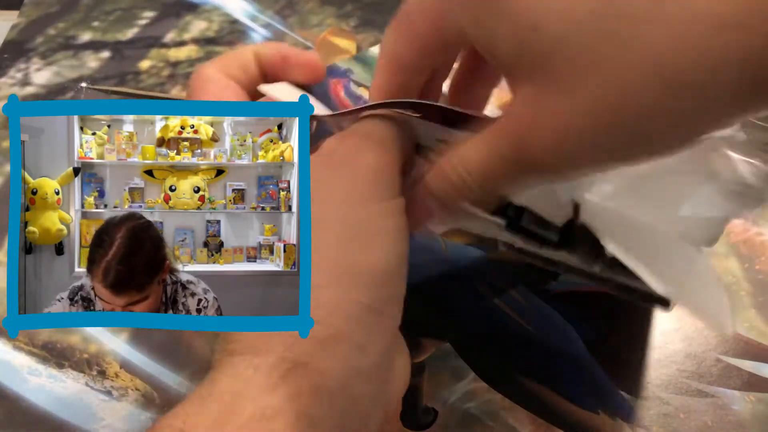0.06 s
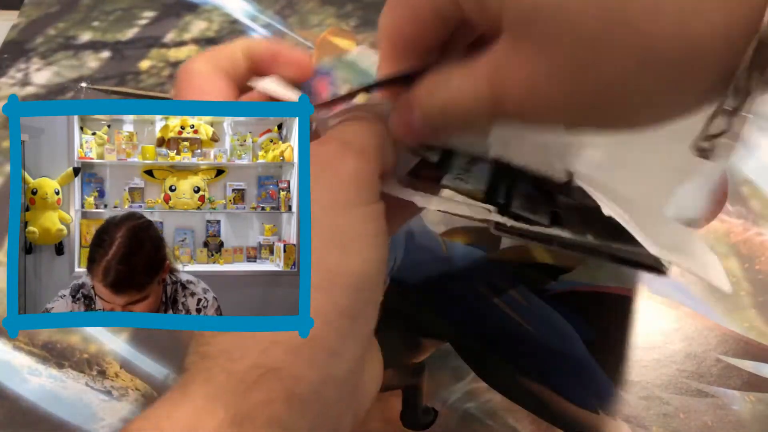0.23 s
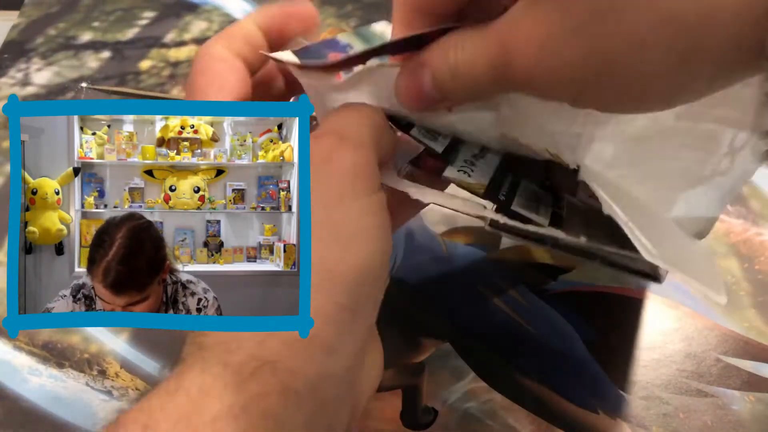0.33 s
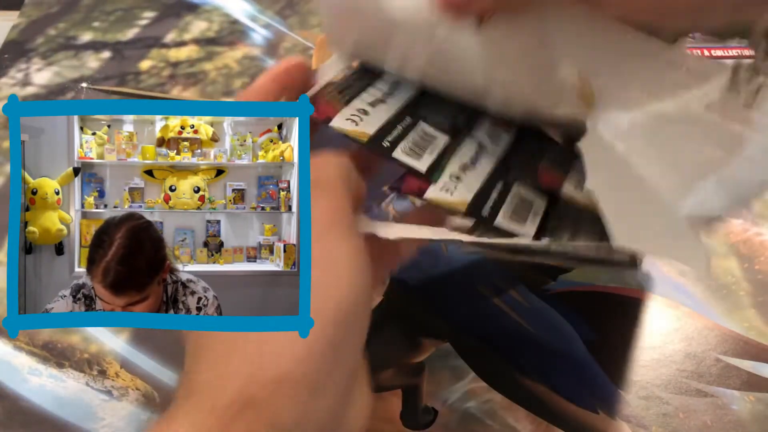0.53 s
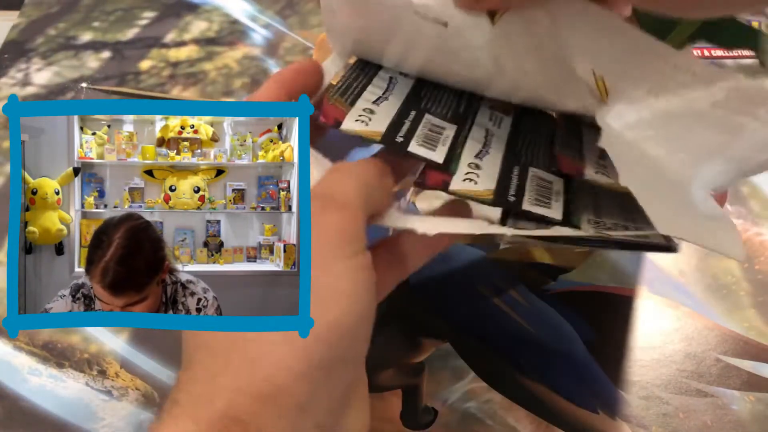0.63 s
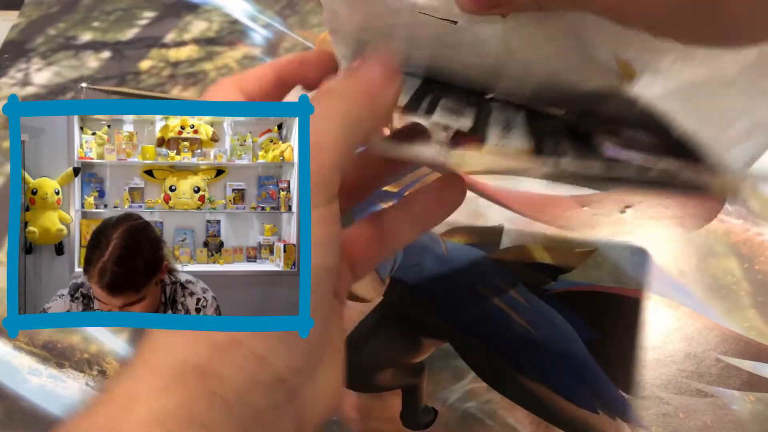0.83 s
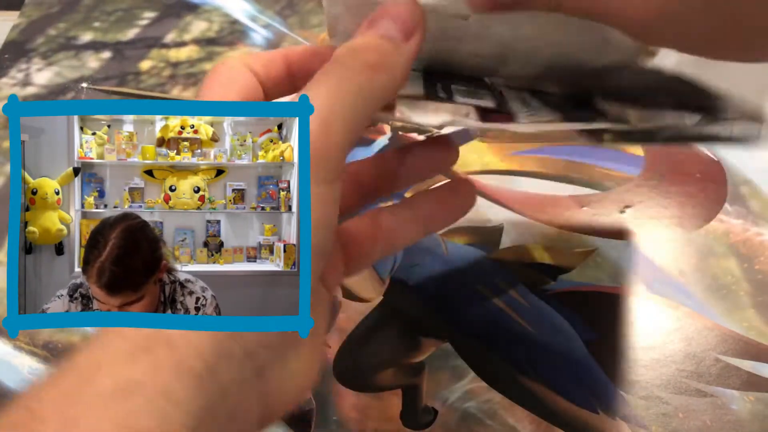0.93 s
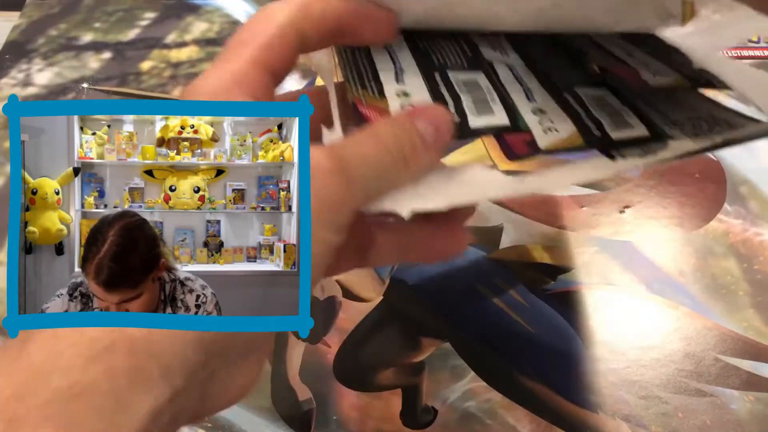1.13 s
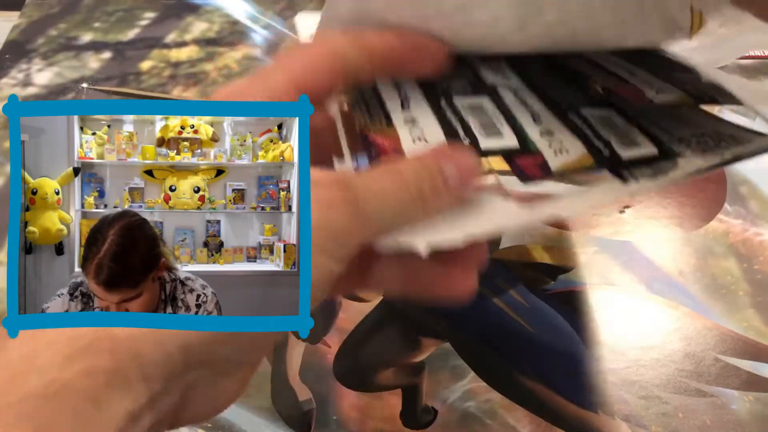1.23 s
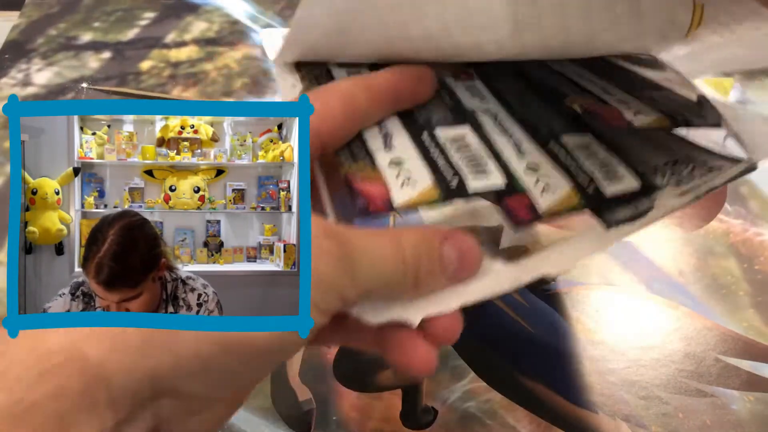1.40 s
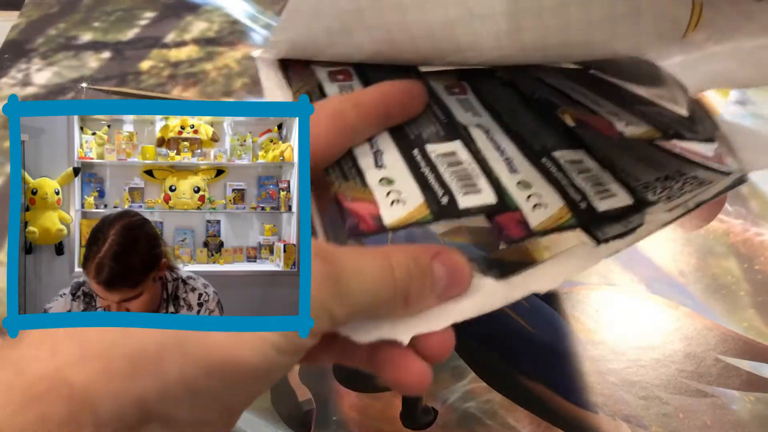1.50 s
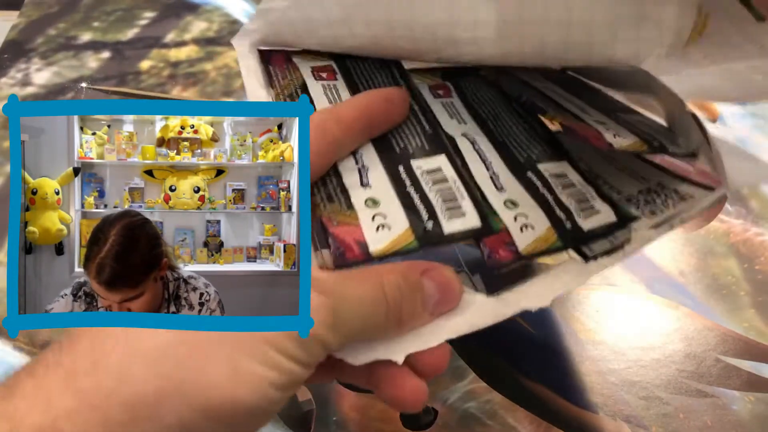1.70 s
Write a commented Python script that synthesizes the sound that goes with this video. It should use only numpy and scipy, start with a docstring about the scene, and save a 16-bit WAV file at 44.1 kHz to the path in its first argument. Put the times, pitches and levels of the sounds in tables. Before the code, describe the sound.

Plastic packaging is torn open by hand, very close, in a small quiet room. Faint rustles and dull creases lead to a loud, sharp snap at 0.23 s with a short roomy tail. A crackling rip swells from 0.35, peaks near 0.54 with a low thump, and ends by 0.7. Quiet small ticks follow; from 1.05 foil packets rasp, slide and crinkle in bursts with soft card knocks until the end.

```python
"""A plastic and cardboard pack is opened by hand, close by in a small room. After a faint rustle
a seal snaps: a brief crack, a bending wave falling in pitch and ringing modes of the pack.
The sheet rips away in a swelling crackle of tiny fractures and flaps with low falling thumps.
Then the foil packets inside slide over the card: filtered crackle follows their levels, crinkling
in short bursts under the fingers, with creases popping, resonant rasps and soft knocks on the card."""
import sys
import numpy as np
from scipy import signal
from scipy.fft import rfft, irfft
from scipy.io import wavfile

SR = 44100
rng = np.random.default_rng(int(sys.argv[2]) if len(sys.argv) > 2 else 0)


def pcm_store(signal):
    """Save signal as 16-bit PCM."""
    levels = np.round(np.clip(np.atleast_2d(signal), -1, 1) * 32767)
    wavfile.write(sys.argv[1], SR, levels.astype(np.int16).T)


N = 77175  # samples, 1.75 s
TOP_HZ = 16300  # upper limit of the sound


def undb(db):
    """Logarithmic level: decibels to amplitude gain."""
    return 10 ** (np.asarray(db) / 20)


def unit(x):
    """Normalisation of power: scale to rms 1."""
    return x / np.sqrt(np.mean(x ** 2) + 1e-18)


def since(start):
    """Elapsed time: seconds since a moment, zero before it."""
    return np.maximum(np.arange(N) / SR - start, 0)


def ring(start, t60):
    """Exponential decay: starts at once and falls by 60 dB in t60 seconds."""
    age = since(start)
    return (age > 0) * np.exp(-np.log(1000) * age / t60)


def bell(centre, width):
    """Gaussian envelope: swells and fades about a moment, width being its standard deviation."""
    t = np.arange(N) / SR
    return np.exp(-.5 * ((t - centre) / width) ** 2)


def resonate(x, hz, width_hz):
    """Resonance by heterodyning: shift the moving centre to zero, low-pass twice, shift back; rms 1."""
    turn = np.exp(2j * np.pi * np.cumsum(hz) / SR)
    pole = np.exp(-np.pi * width_hz / SR)
    smoothed = signal.lfilter([1], np.poly([pole, pole]), x / turn)
    return unit((smoothed * turn).real)


def curve(rows, axis=1):
    """Level contour: gain along one dB column of a table, silent before its first row."""
    rows, t = np.array(rows), np.arange(N) / SR
    return undb(np.interp(t, rows[:, 0], rows[:, axis])) * (t >= rows[0, 0])


def colour(x, points):
    """Minimum-phase filtering: a causal response through (Hz, dB) points, with unit power gain."""
    size = 8192
    hz, db = np.array(points).T
    bins_hz = np.arange(size // 2 + 1) * SR / size
    log_gain = np.log(undb(np.interp(np.log(bins_hz + 1), np.log(hz), db)))
    # folding the cepstrum forward in time makes the response causal
    cepstrum = irfft(log_gain)
    cepstrum[1:size // 2] *= 2
    cepstrum[size // 2 + 1:] = 0
    response = irfft(np.exp(rfft(cepstrum)))
    return signal.fftconvolve(x, response / np.linalg.norm(response))[:N]


def noise(points):
    """Spectral shaping: white noise filtered to a colour, about rms 1."""
    return colour(rng.standard_normal(N), points)


def crackle(per_s, spread_db, hiss):
    """Shot noise: tiny fractures of uneven size at random moments, with a share of smooth friction."""
    size = undb(spread_db * np.minimum(rng.exponential(size=N), 4))
    happens = rng.random(N) < per_s / SR
    clicks = unit(happens * size * rng.choice([-1, 1], N))
    return unit(clicks + hiss * rng.standard_normal(N))


FACET_LOW_HZ, FACET_CYCLES = 567, 2.6  # lowest pitch; cycles in which a ring falls to 1/e
FACETS_PER_S, FACET_SHARE = 7000, 0.79  # share is an amplitude, against 0.5 of plain crackle


def facets(per_s, spread_db, hiss):
    """Superposed damped rings: fractures ring at their own pitches, flat in spectrum on average."""
    out, age = np.zeros(2 * N), np.arange(SR // 100) / SR
    for when, pitch, size, turn in rng.random((int(FACETS_PER_S * N / SR), 4)):
        hz = FACET_LOW_HZ + (TOP_HZ - FACET_LOW_HZ) * pitch
        # the root of the pitch makes up for the shorter ring of a high facet
        gain = np.sqrt(hz) * undb(-spread_db * np.log(max(size, np.exp(-2))))
        decay = np.exp(-age * hz / FACET_CYCLES)
        start = int(when * N)
        out[start:start + len(age)] += gain * decay * np.sin(2 * np.pi * (hz * age + turn))
    return unit(FACET_SHARE * unit(out[:N]) + crackle(per_s, spread_db, hiss) / 2)


def struck(start, modes):
    """Modal superposition: damped modes start together, with alternating polarity."""
    out = np.zeros(N)
    for k, (hz, db, t60) in enumerate(modes):
        out += undb(db) * ring(start, t60) * np.sin(2 * np.pi * hz * since(start)) * (-1) ** k
    return out


# spectrum of the quiet room: (frequency [Hz], relative level [dB])
FLOOR_COLOUR = [(20, -14), (50, 4.5), (300, -13), (550, -23), (2600, -11.5), (16000, -52)]
FLOOR_DB = -63.5


def room_floor():
    """Stationary background noise: a steady, coloured random pressure."""
    return undb(FLOOR_DB) * noise(FLOOR_COLOUR)


# spectrum of the reverberation: (frequency [Hz], relative level [dB])
ROOM_COLOUR = [(90, -6.5), (270, -2.5), (1300, 2.5), (2400, -2), (16000, -14.5)]
ROOM_T60_S, ROOM_DELAY_S = 0.43, 0.0027


def room(x):
    """Reverberation as convolution: a short, dull decaying-noise tail from table and walls."""
    tail = noise(ROOM_COLOUR) * ring(ROOM_DELAY_S, ROOM_T60_S)
    return signal.fftconvolve(x, tail / np.linalg.norm(tail))[:N] / 2


# low spectrum of the moving sheet and pack: (frequency [Hz], relative level [dB])
RIP_BASS = [(25, -15), (150, -7.5), (215, -2.5), (290, 0.5), (450, -7), (2000, -36.5)]
GRIP_S, GRIP_WIDTH_S, GRIP_DB = 1.14, 0.17, -60


def grip():
    """Low-frequency random excitation: the pack rumbles while the hands take a new grip."""
    return undb(GRIP_DB) * bell(GRIP_S, GRIP_WIDTH_S) * noise(RIP_BASS)


# packets dragging on the card: (time [s], level [dB], resonance [Hz])
DRAG = [(1.083, -45, 576), (1.135, -49.5, 640), (1.205, -46, 855), (1.29, -52, 770), (1.48, -49, 860),
        (1.75, -84, 850)]
# the larger slips: (time [s], drive level [dB])
SLIPS = [(1.0848, -35.5), (1.1196, -35.5)]
DRAG_PER_S, DRAG_SPREAD_DB, DRAG_WIDTH_HZ = 420, 1.5, 470
SLIP_T60_S = 0.026


def drag():
    """Stick-slip friction: packets rasp through a hollow whose resonance moves as they drag."""
    rows = np.array(DRAG)
    hz = np.interp(np.arange(N) / SR, rows[:, 0], rows[:, 2])
    friction = crackle(DRAG_PER_S, DRAG_SPREAD_DB, hiss=0.33)
    rasp = curve(DRAG) * resonate(friction, hz, DRAG_WIDTH_HZ)
    # subtracting a faster decay rounds the onset of each slip
    slips = sum(undb(db) * (ring(s, SLIP_T60_S) - ring(s, SLIP_T60_S / 10)) for s, db in SLIPS)
    return rasp + slips * resonate(rng.standard_normal(N), hz, DRAG_WIDTH_HZ)


# the sheet flexing: (time [s], peak level [dB], start pitch [Hz], end pitch [Hz], fade [s])
FLEXES = [(0.099, -44, 137, 48.6, 0.0095), (.231, -47, 202, 44, 0.011), (0.534, -32.5, 356, 49.6, 0.0075),
          (0.609, -37, 184, 133, 0.0058), (1.231, -43.5, 312, 69, 0.0077)]


def flexes():
    """Bending of a flexible sheet: each thump swells, fades and falls in pitch."""
    out = np.zeros(N)
    for s, db, start_hz, end_hz, fade in FLEXES:
        age = since(s)
        hz = end_hz + (start_hz - end_hz) * np.exp(-age / fade)
        swell = age / fade * np.exp(1 - age / fade)
        out += undb(db) * swell * np.sin(2 * np.pi * np.cumsum(hz * (age > 0)) / SR)
    return out


# modes of the card: (frequency [Hz], relative level [dB], t60 [s])
CARD_MODES = [(214, 3.5, 0.017), (264.6, -1, 0.068), (334, -5, 0.063)]
# soft knocks on the card: (time [s], drive level [dB])
KNOCKS = [(0.857, -43), (1.153, -34), (1.362, -38), (1.427, -36), (1.504, -33), (1.71, -40.5)]


def knocks():
    """Impulsive excitation of modes: a soft contact rounds the onset of the card's ring."""
    return sum(undb(db) * (1 - np.exp(-since(s) / 0.001)) * struck(s, CARD_MODES) for s, db in KNOCKS)


CARD_RING_DB = -24.5


def on_card(x):
    """Sympathetic resonance: a sound together with the ring that it stirs in the card."""
    response = struck(0, CARD_MODES)
    stirred = signal.fftconvolve(x, response / np.linalg.norm(response))[:N]
    return x + undb(CARD_RING_DB) * stirred


# single creases popping: (time [s], level [dB], treble relative to it [dB])
CREASES = [(0.0581, -41.5, -19), (0.0923, -36, -27), (.336, -33.5, 7), (0.4115, -33.5, 4), (.4572, -39, 9),
           (0.494, -23, 1.5), (0.529, -21.5, 4.5), (0.535, -15.5, -12), (0.5438, -28, -8), (0.5604, -33, 8),
           (0.588, -36, -24), (0.6151, -30, -28), (0.659, -29.5, -30), (.852, -40.5, 5),
           (0.888, -38.5, -31), (1.064, -47.5, 8), (1.0712, -37, 9.5), (1.1412, -30, 1.5), (1.3283, -41, 7),
           (1.354, -36.5, 4), (1.4591, -36.5, -8), (1.5023, -32.5, 5.5), (1.7108, -36.5, -2.5)]
# body spectrum of a crease: (frequency [Hz], relative level [dB per Hz])
CREASE_BODY = [(150, -16), (550, -3.5), (1300, 5), (3400, -5), (16000, -61)]
# treble spectrum shared by creases, foil, rip and crack: (frequency [Hz], relative level [dB])
TREBLE = [(1500, -25.5), (3000, 4), (4200, 2), (7300, -4), (8700, 0.5), (11600, -1.5), (13500, -6),
          (16000, -20.5)]
CREASE_T60_S = 0.013


def creases():
    """Buckling instability: each crease gives way in a short burst, dull in card, bright in foil."""
    body_level, treble_level = np.zeros(N), np.zeros(N)
    for s, db, treble_db in CREASES:
        burst = undb(db) * ring(s, CREASE_T60_S)
        body_level += burst
        treble_level += burst * undb(treble_db)
    body = colour(body_level * rng.standard_normal(N), CREASE_BODY)
    treble = colour(treble_level * rng.standard_normal(N), TREBLE)
    return body + treble


# packets sliding: (time [s], treble level [dB], middle level [dB])
SLIDE = [(0, -68, -59.5), (.06, -75.5, -74.5), (.124, -57, -50), (.16, -72, -65), (.205, -58, -55),
         (.3, -75, -71), (.76, -76, -65), (.802, -56.5, -54), (.93, -70.5, -65), (1.04, -59, -51),
         (1.09, -49, -54.5), (1.17, -51, -48), (1.255, -58, -54.5), (1.385, -48.5, -49), (1.49, -45.5, -45),
         (1.55, -48.5, -49.5), (1.66, -51.5, -49), (1.75, -58, -57)]
# bursts of crinkling: (centre time [s], standard deviation [s], level [dB], relative treble [dB])
CRINKLES = [(1.134, 0.0045, -38.5, -4), (1.155, 0.0035, -40.5, -19), (1.2925, 0.0034, -40.5, -2.5),
            (1.3612, 0.0012, -42.5, -3), (1.423, 0.0085, -38.5, 1), (1.463, 0.0018, -32.5, 0.5),
            (1.475, 0.0074, -37.5, -5), (1.506, 0.003, -40.5, -2), (1.572, 0.0033, -40.5, -5),
            (1.5874, 0.0018, -36.5, -4), (1.623, 0.0035, -43, -6), (1.644, 0.0029, -39.5, -2.5)]
# middle spectrum of the foil: (frequency [Hz], relative level [dB])
FOIL_MIDDLE = [(100, -11.5), (270, 4), (400, 1), (560, -11), (860, -2), (1850, -4.5), (2400, -1),
               (3000, -2.5), (4000, -8), (12000, -69)]
FOIL_PER_S, FOIL_SPREAD_DB, FOIL_HISS = 900, 2, 0.62  # hiss is relative to the clicks
TAUT_S, TAUT_SPAN_S, TAUT_DB, TAUT_HZ, TAUT_WIDTH_HZ = 1.63, 0.028, -50.5, 2280, 960


def foil():
    """Friction and folding: sliding packets rustle, crinkle in bursts, and one held taut resonates."""
    treble, middle = curve(SLIDE, axis=1), curve(SLIDE, axis=2)
    for s, width, db, treble_db in CRINKLES:
        burst = undb(db) * bell(s, width)
        # powers add
        treble = np.hypot(treble, undb(treble_db) * burst)
        middle = np.hypot(middle, burst)
    folds = facets(FOIL_PER_S, FOIL_SPREAD_DB, FOIL_HISS)
    taut_ring = resonate(folds, np.full(N, TAUT_HZ), TAUT_WIDTH_HZ)
    taut = undb(TAUT_DB) * bell(TAUT_S, TAUT_SPAN_S) * taut_ring
    return colour(folds * treble, TREBLE) + colour(folds * middle, FOIL_MIDDLE) + taut


# the rip: (time [s], treble level [dB], middle level [dB], bass level [dB])
RIP = [(.28, -51.5, -72, -63), (.35, -47, -50, -65), (.369, -36.5, -42, -55.5), (.395, -45.5, -50, -72),
       (.452, -44.5, -50, -61.5), (.472, -36, -39.5, -52.5), (.517, -31, -31.5, -46.5),
       (.535, -26.5, -24, -28), (.572, -30, -35.5, -37), (.587, -27.5, -28, -41.5), (.605, -43.5, -44, -41),
       (.655, -56.5, -44.5, -44.5), (.715, -85, -90, -81)]
# middle spectrum of the rip: (frequency [Hz], relative level [dB])
RIP_MIDDLE = [(250, -33), (1060, 2), (1900, -0.5), (2750, 6), (3500, -3.5), (12000, -54.5)]
RIP_PER_S, RIP_SPREAD_DB, RIP_HISS = 1500, 3, 0.3  # hiss is relative to the clicks
CATCHES_PER_S, CATCH_DB = 260, 1.1  # the tear catches and runs on; rms change of level


def rip():
    """Intermittent fracture: fibres part in fits and starts while the freed sheet booms."""
    # a random level is held from one catch to the next
    catch_count = np.cumsum(rng.random(N) < CATCHES_PER_S / SR)
    catch = rng.uniform(-0.92, 1, N)[catch_count]
    fibres = unit(facets(RIP_PER_S, RIP_SPREAD_DB, RIP_HISS) * undb(CATCH_DB * unit(catch)))
    treble = curve(RIP, axis=1) * colour(fibres, TREBLE)
    middle = curve(RIP, axis=2) * colour(fibres, RIP_MIDDLE)
    boom = curve(RIP, axis=3) * noise(RIP_BASS)
    return treble + middle + boom


# modes of the pack: (frequency [Hz], relative level [dB], t60 [s])
PACK_MODES = [(247, -7, 0.036), (366, -2.5, 0.038), (890, -2.5, 0.022), (1288, 7.5, 0.023),
              (1540, -2, 0.032), (1717, 7.5, 0.026), (2560, -3, 0.011), (3185, 5, 0.02), (5260, 4, 0.0088)]
SNAP_S, SNAP_DB = .2274, -5.5  # moment; peak level of the bending wave before its sine
CRACK_LEAD_S, CRACK_DB, CRACK_T60_S = 0.0019, -27.5, 0.036
BEND_TOP_HZ, BEND_FALL_S, BEND_RISE_S, BEND_FADE_S = 3265, 0.00443, 0.00034, 0.0014
SNAP_RING_DB, SNAP_RING_RISE_S = -16.5, 0.003


def snap():
    """Dispersion of bending waves: after a tiny crack treble arrives first, and the pack rings."""
    age = since(SNAP_S)
    # pitch falls as 1 / (1 + age / BEND_FALL_S)
    phase = 2 * np.pi * BEND_TOP_HZ * BEND_FALL_S * np.log1p(age / BEND_FALL_S)
    swell = (1 - np.exp(-(age / BEND_RISE_S) ** 2)) * np.exp(-age / BEND_FADE_S)
    bend = undb(SNAP_DB) * swell / swell.max() * np.sin(phase)
    onset = 1 - np.exp(-age / SNAP_RING_RISE_S)
    body = undb(SNAP_RING_DB) * onset * struck(SNAP_S, PACK_MODES)
    crack = undb(CRACK_DB) * ring(SNAP_S - CRACK_LEAD_S, CRACK_T60_S) * noise(TREBLE)
    return bend + body + crack


# spectrum of the snap's diffuse tail: (frequency [Hz], relative level [dB per Hz])
SNAP_TAIL = [(60, -28), (300, -3.5), (650, 1), (1300, -1), (2400, -2), (4300, -19), (16000, -36)]
SNAP_TAIL_DB, SNAP_TAIL_T60_S = -27.5, 0.27


def snap_tail():
    """Diffuse-field decay: the snap leaves coloured noise dying away exponentially."""
    decay = ring(SNAP_S + ROOM_DELAY_S, SNAP_TAIL_T60_S)
    return undb(SNAP_TAIL_DB) * decay * noise(SNAP_TAIL)


SNAP_SEND_DB, PACK_SEND_DB = -14.5, -10.5  # sent into the room, which halves the amplitude


def scene():
    """Superposition: the pack close by, its echo, the tail of the snap and the quiet room."""
    seal = snap()
    card = drag() + grip() + flexes() + knocks()
    pack = on_card(creases() + rip() + foil()) + card
    echo = room(undb(SNAP_SEND_DB) * seal + undb(PACK_SEND_DB) * pack)
    return (seal + pack + echo + snap_tail() + room_floor())[None]


def record(dry):
    """Band limitation: a steep elliptic low-pass cuts the top."""
    low_pass = signal.ellip(8, .2, 70, TOP_HZ, fs=SR, output="sos")
    return signal.sosfilt(low_pass, dry)


dry = scene()
out = record(dry)
pcm_store(out)
```